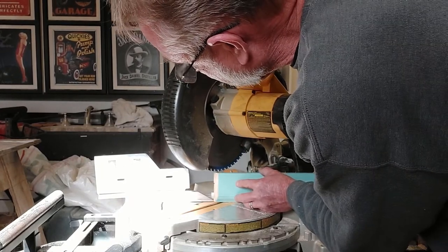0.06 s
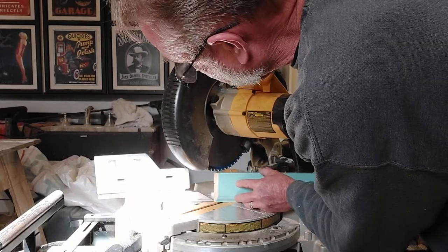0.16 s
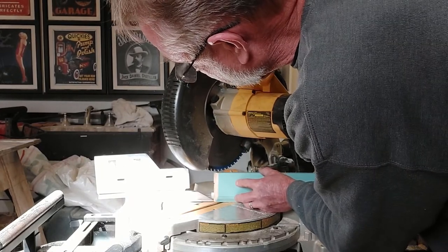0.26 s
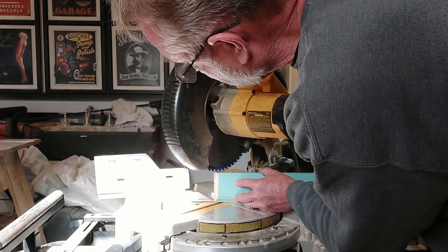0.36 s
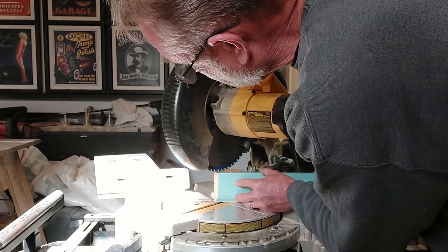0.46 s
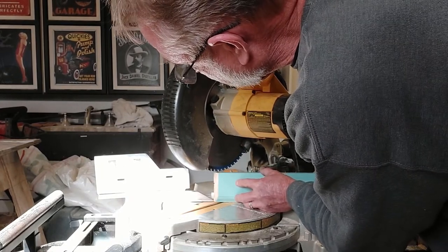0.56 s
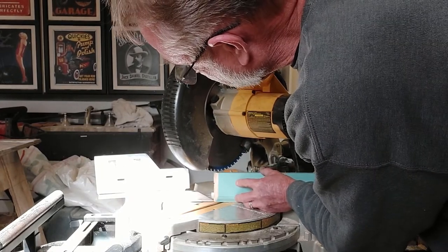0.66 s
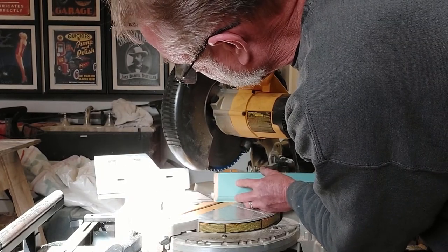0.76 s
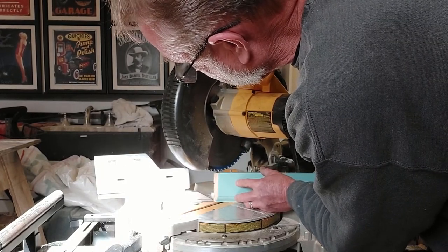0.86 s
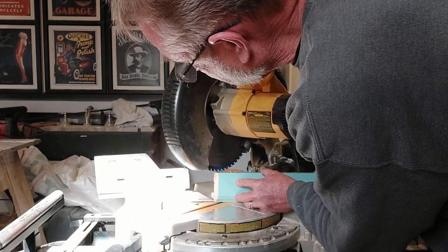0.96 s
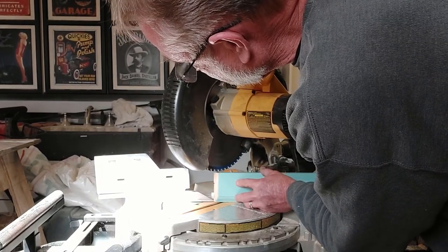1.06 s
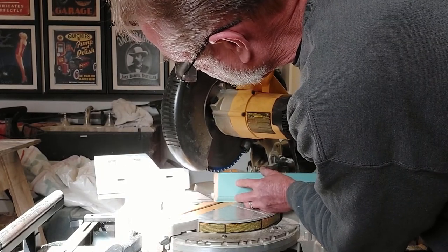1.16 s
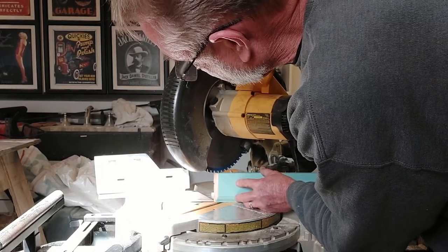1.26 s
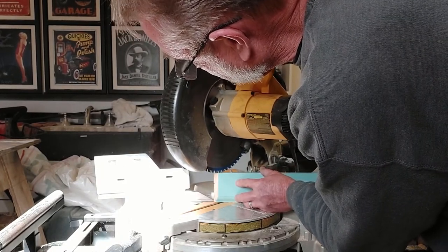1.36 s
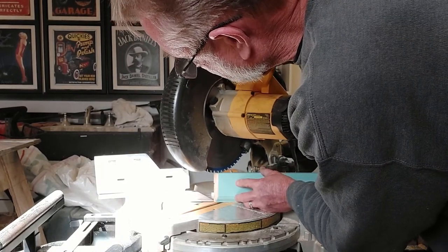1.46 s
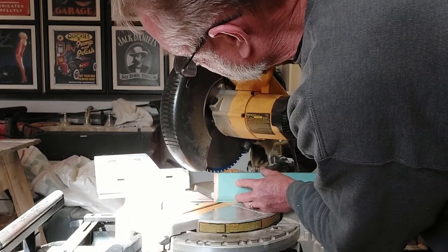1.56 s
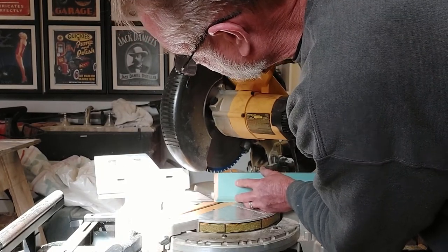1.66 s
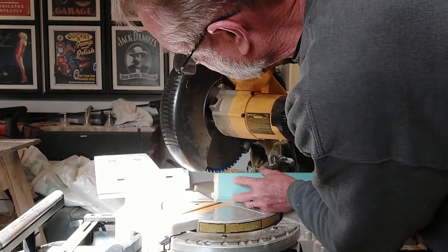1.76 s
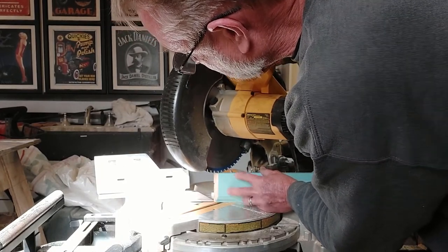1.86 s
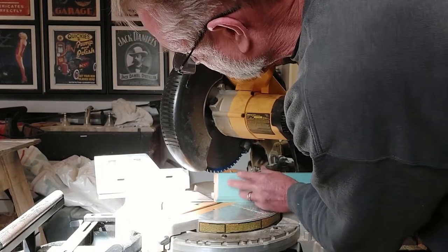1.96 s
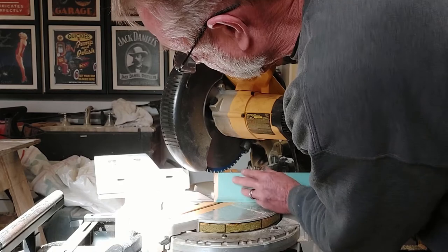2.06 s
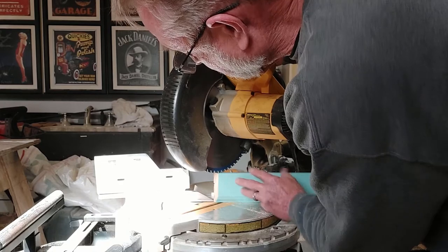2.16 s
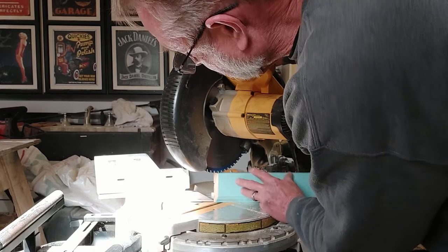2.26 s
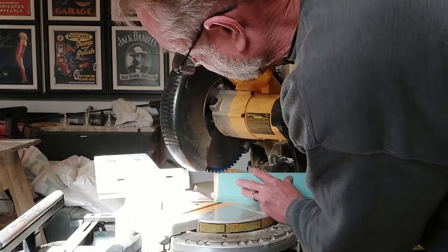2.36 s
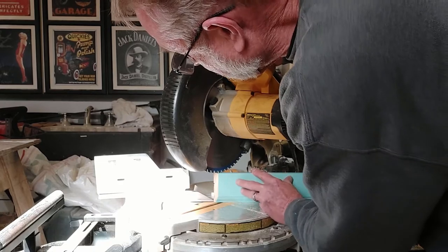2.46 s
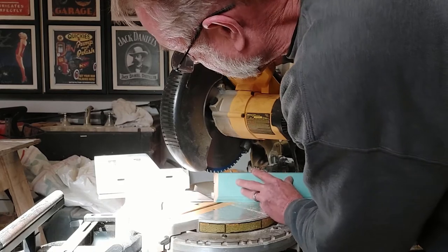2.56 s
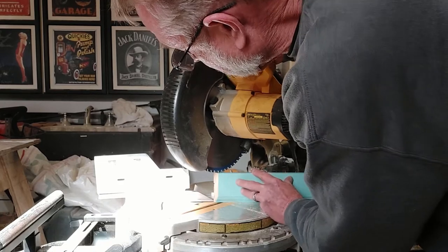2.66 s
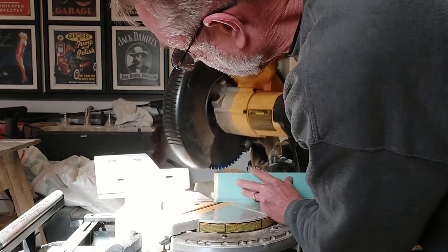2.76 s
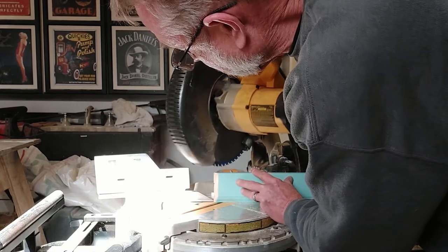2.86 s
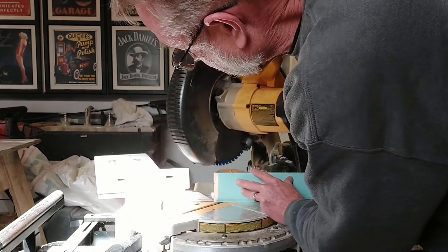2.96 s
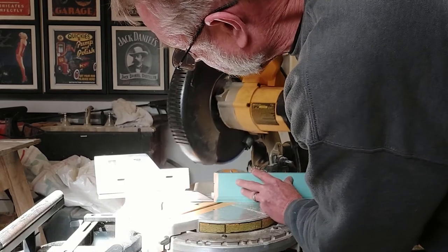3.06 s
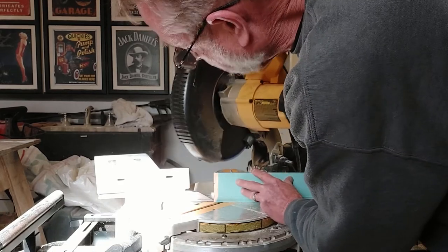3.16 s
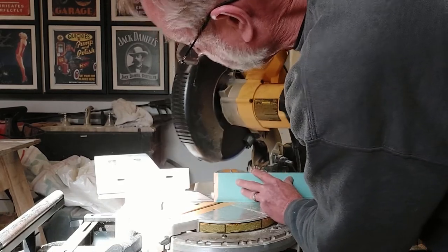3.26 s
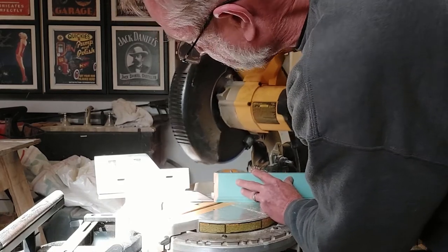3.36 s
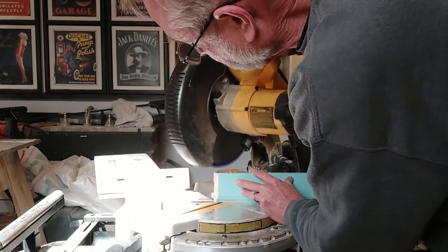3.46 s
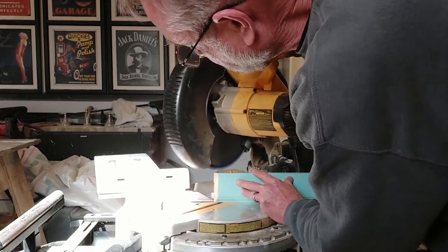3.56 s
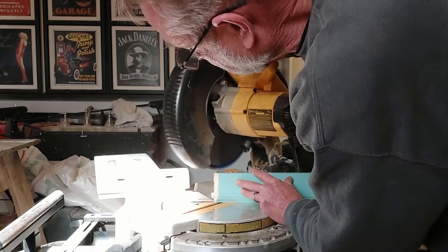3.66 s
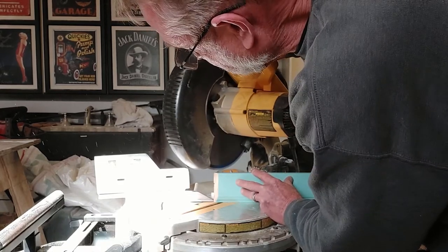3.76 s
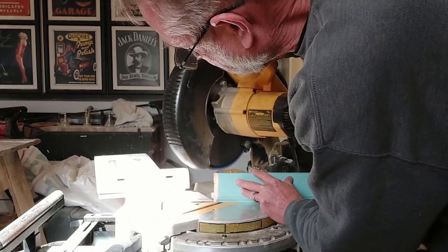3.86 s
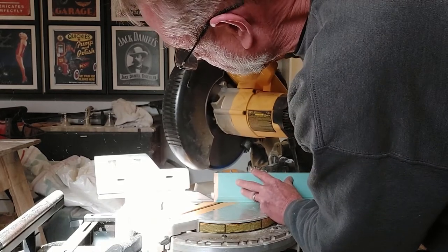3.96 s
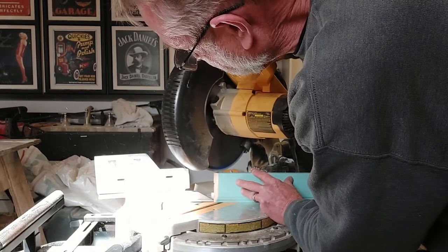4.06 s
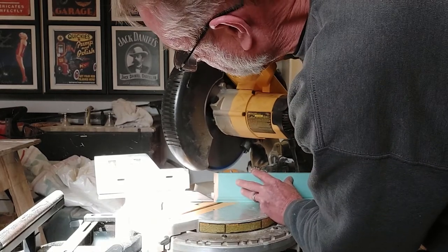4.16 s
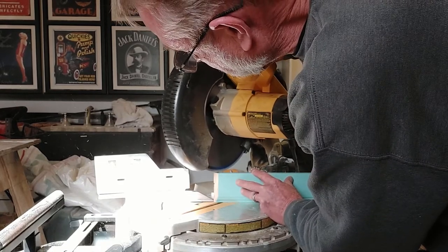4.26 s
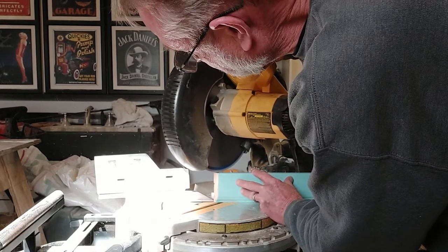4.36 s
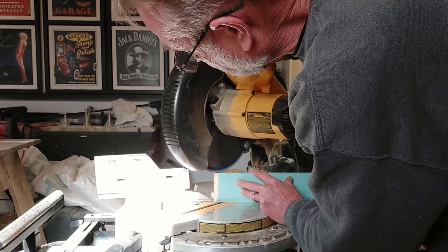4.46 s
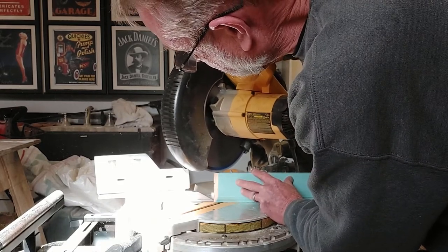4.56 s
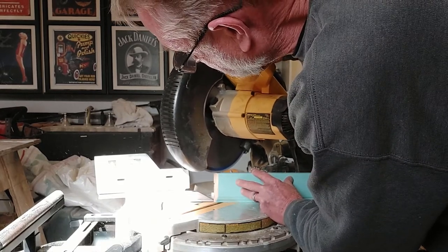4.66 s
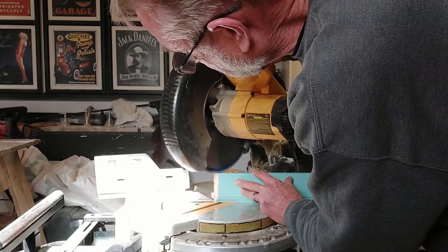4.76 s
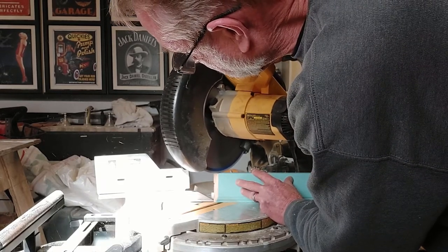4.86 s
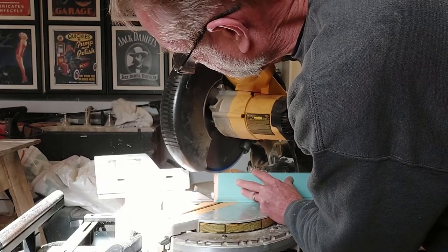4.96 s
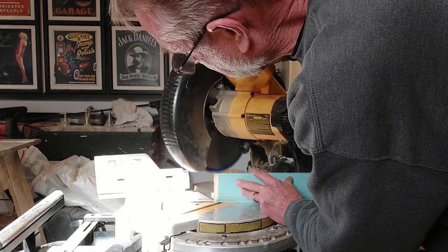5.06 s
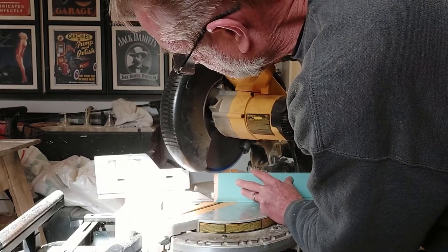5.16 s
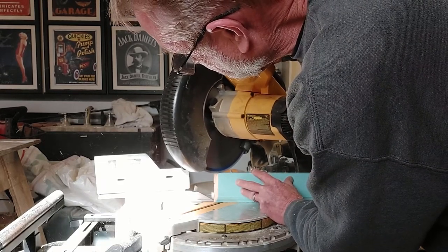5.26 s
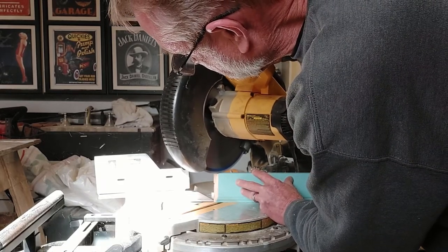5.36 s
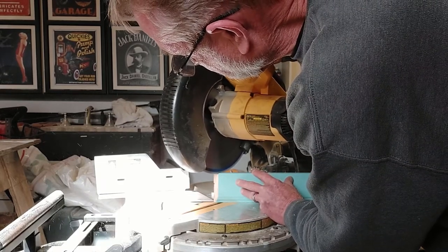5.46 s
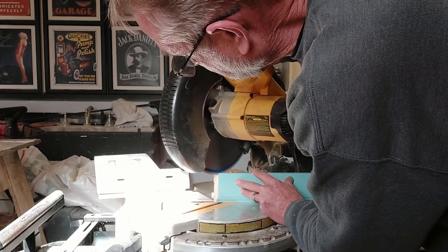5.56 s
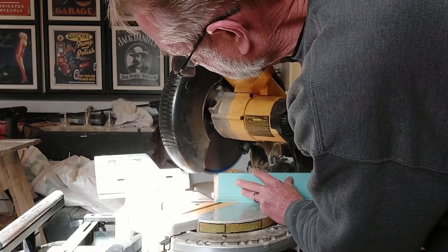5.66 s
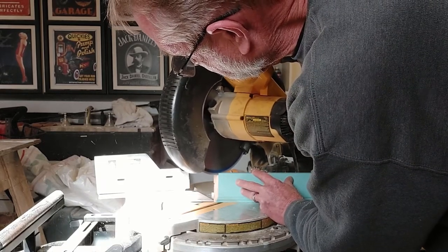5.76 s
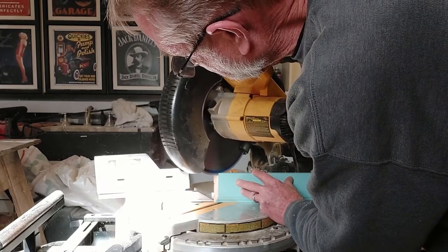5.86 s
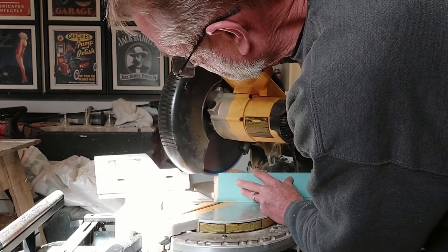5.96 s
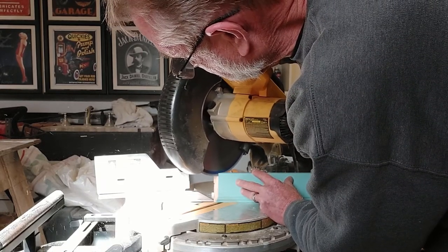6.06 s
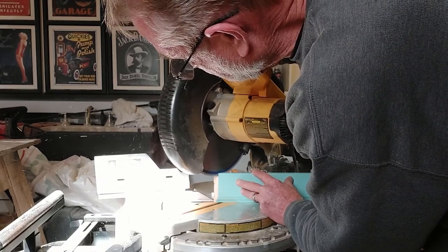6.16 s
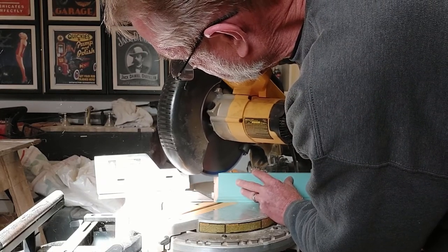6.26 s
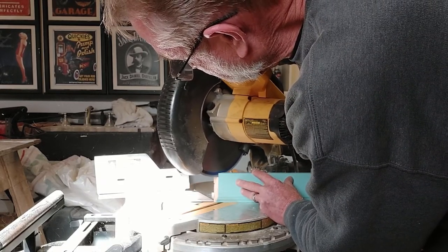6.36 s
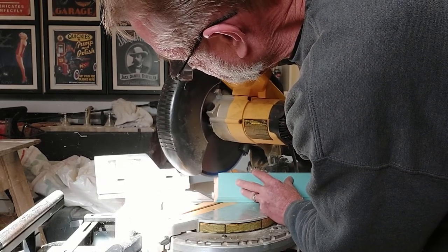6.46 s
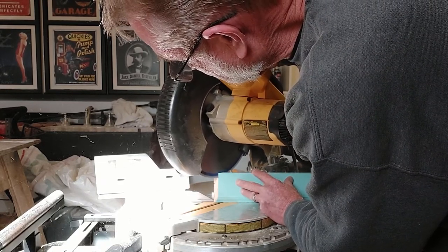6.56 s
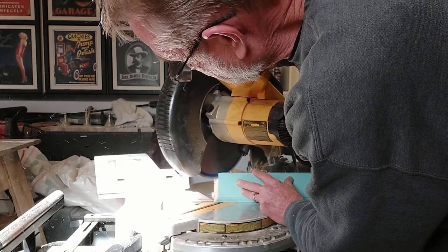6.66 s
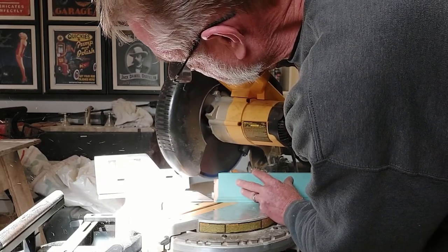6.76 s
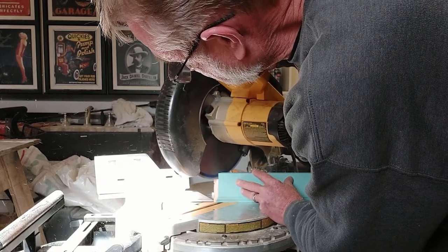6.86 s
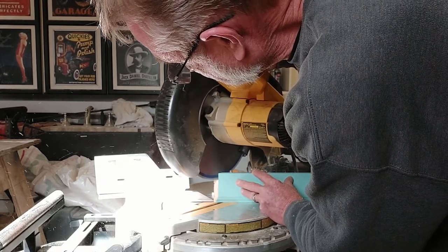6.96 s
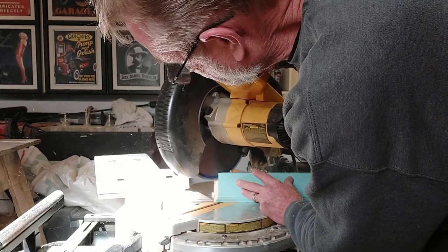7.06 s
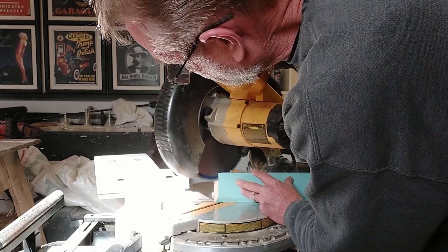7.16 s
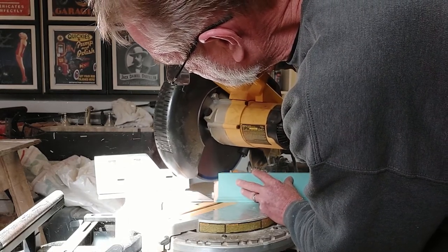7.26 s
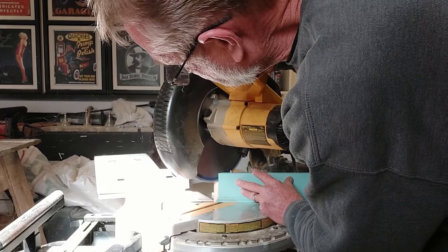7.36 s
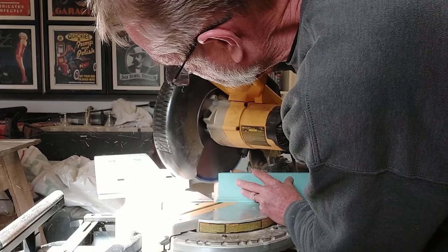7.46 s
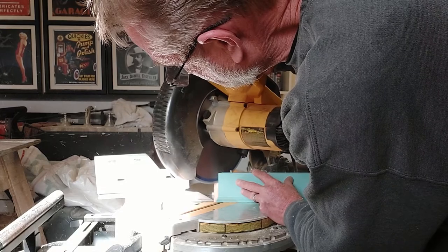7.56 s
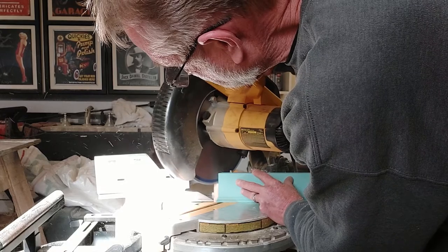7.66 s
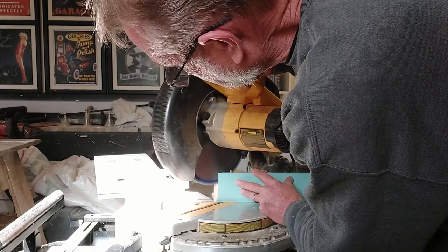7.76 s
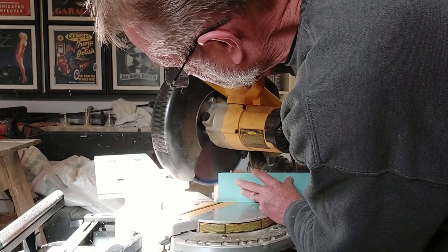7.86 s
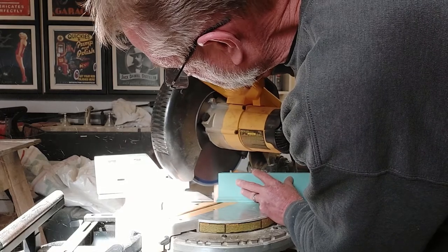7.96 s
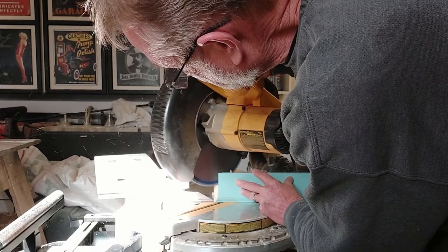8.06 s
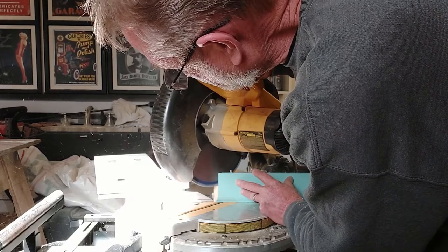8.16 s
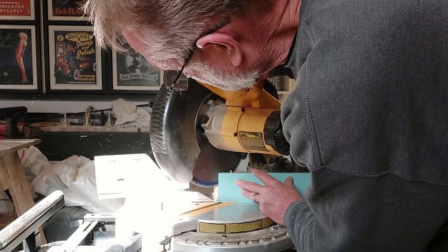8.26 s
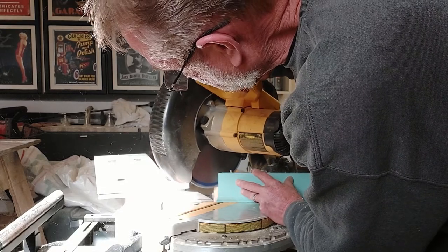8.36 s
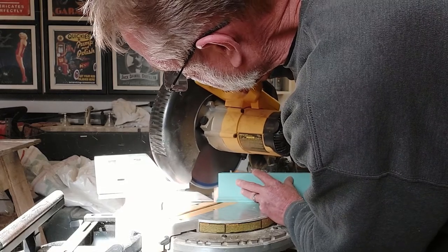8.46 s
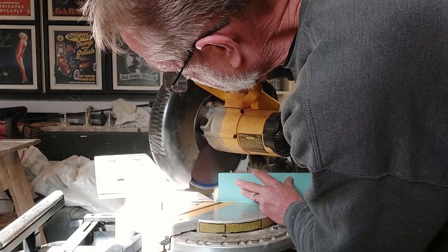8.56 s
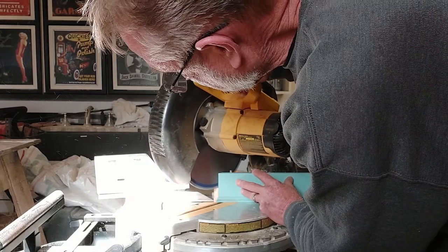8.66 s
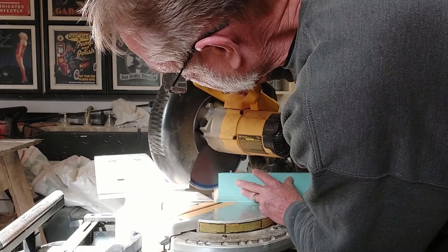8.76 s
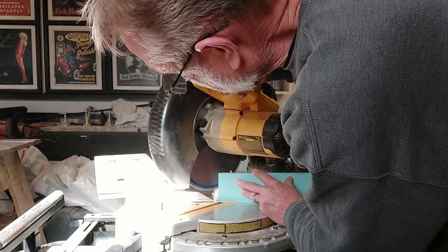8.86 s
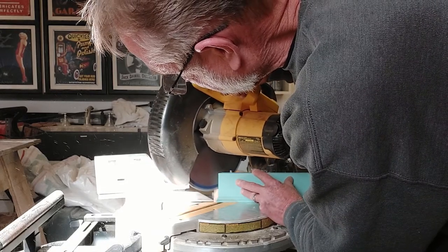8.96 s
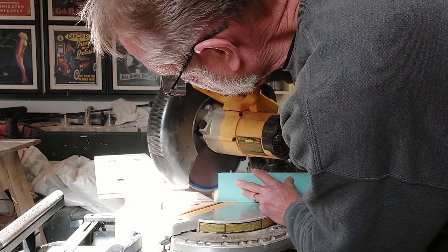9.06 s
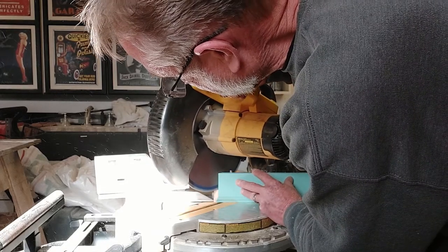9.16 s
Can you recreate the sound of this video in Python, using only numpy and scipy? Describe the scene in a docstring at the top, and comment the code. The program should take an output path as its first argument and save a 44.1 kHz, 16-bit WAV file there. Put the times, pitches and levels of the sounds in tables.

```python
"""A small workshop: a length of wooden trim is nudged along the fence of a miter saw.
Behind it lie a low hum (shaped noise and steady tones), room air and a thin, very high whistle.
The saw's trigger clicks and it spins up with a rising whine: tones follow the motor's speed, over rushing air noise.
The blade is eased into the trim; its steel plate sings and squeals, as wavering tones that follow the load.
A gain control turns everything down as the motor starts."""
import sys
import numpy as np
from scipy import signal
from scipy.fft import rfft, irfft, next_fast_len
from scipy.io import wavfile
from scipy.ndimage import uniform_filter1d, minimum_filter1d, map_coordinates

SR = 44100
rng = np.random.default_rng(int(sys.argv[2]) if len(sys.argv) > 2 else 0)


def dump(signal):
    """Clip the signal to [-1, 1] and save it as 16-bit WAV at the path in sys.argv[1]."""
    limited = np.clip(np.atleast_2d(signal).T, -1, 1)
    pcm = np.round(limited * 32767).astype(np.int16)
    wavfile.write(sys.argv[1], SR, pcm)


N = 406161
TIME = np.arange(N) / SR  # seconds
START = 3.085  # the motor starts (s)
CONTACT_S, ENTRY_S = 4.76, 0.06  # the teeth touch the trim; time until they are all cutting
FULL_HZ = 372.55  # the motor's free speed (turns a second)
RANGE_DB = 20  # the most that the gain control turns down

# colour of a dull wooden knock: (frequency [Hz], level per Hz [dB])
WOOD_COLOUR = [(120, -45), (200, -32), (291, -40), (374, -17), (475, -30), (559, -2.5), (856, 5),
               (1030, 4.5), (1540, -8), (4000, -19), (5200, -23), (8800, -120)]
# colour of a bright click: (frequency [Hz], level per Hz [dB])
CLICK_COLOUR = [(400, -30), (900, -7), (2000, 0), (2700, -3), (3300, -1), (4000, -6), (5600, -4.5),
                (8500, -9), (11000, -17), (15000, -24)]


def amp(db):
    """Turn decibels into a gain."""
    return np.exp(np.asarray(db) * (np.log(10) / 20))


def unit(x):
    """Scale a sound to rms 1."""
    return x / np.sqrt(np.mean(x ** 2) + 1e-20)


def along(points, hz):
    """Read a curve of (Hz, value) points on a log frequency axis."""
    f, v = np.transpose(points)
    return np.interp(np.log(hz + 1), np.log(f + 1), v)


def curves(rows):
    """Give one value per sample for each column after the time."""
    s, *cols = np.transpose(rows)
    return [np.interp(TIME, s, c) for c in cols]


def wobble(rate):
    """Draw a smooth random curve with rate random points a second."""
    coarse = np.arange(0, N / SR * rate + 1, 1 / 8)
    points = rng.standard_normal(int(N * rate / SR) + 4)
    return np.interp(TIME * rate, coarse, map_coordinates(points, [coarse]))


def ramp(start_s, rise_s):
    """Go from 0 to 1 in a straight line."""
    return np.clip((TIME - start_s) / max(rise_s, 1e-4), 0, 1)


def swell(start_s, length_s, rise_s, fall_db_per_s):
    """Rise, hold until the length is over, die away."""
    overtime = np.maximum(TIME - start_s - length_s, 0)
    return ramp(start_s, rise_s) * amp(-abs(fall_db_per_s) * overtime)


def filtered(x, response):
    """Reshape the spectrum of x by a gain for each frequency."""
    m = next_fast_len(N + SR // 2)
    return irfft(rfft(x, m) * response(np.fft.rfftfreq(m, 1 / SR)), m)[:N]


def noise(spectrum):
    """Make coloured noise of rms 1."""
    return unit(filtered(rng.standard_normal(N), lambda hz: amp(along(spectrum, hz))))


def body(modes, f):
    """Complex response of (Hz, width Hz, dB) resonances, with alternating signs, at the frequencies f."""
    return sum((-1) ** k * amp(db) * 1j * f * width / (centre * centre - f * f + 1j * f * width)
               for k, (centre, width, db) in enumerate(modes))


def resonate(x, modes):
    """Pass x through a body's resonances, at rms 1."""
    return unit(filtered(x, lambda f: body(modes, f)))


def lift(modes, f):
    """Boost a tone as it sweeps through (Hz, width Hz, dB) resonances."""
    return 1 + sum(np.abs(body([mode], f)) for mode in modes)


def above(f, edge_hz, order):
    """Gain of a part that radiates only above an edge frequency."""
    return 1 / (1 + (edge_hz / (f + 1)) ** order)


def tone(cycles, flutter_db, blur, rate):
    """Make a tone of rms 1 whose level and phase waver; cycles counts its periods so far."""
    phase = 2 * np.pi * (cycles - np.floor(cycles)) + blur * wobble(2 * rate)
    return unit(amp(flutter_db * wobble(rate)) * np.sin(phase))


def background():
    """Low hum, room air and a thin whistle that wavers in pitch; all of it fades up at the start."""
    # steady tones in the hum: (frequency [Hz], level [dB])
    room_tones = [(120, -50), (840, -60.5), (2050, -60)]
    # colours of the hum, the air and the hiss around the whistle: (frequency [Hz], level per Hz [dB])
    hum_colour = [(15, -52), (25, -49), (53, -7), (75, 2.5), (128, -7.5), (206, -18), (237, -10),
                  (251, -14), (263, -31.5), (328, -19.5), (400, -24), (520, -23), (880, -120)]
    air_colour = [(120, -24), (240, 0.5), (400, -7), (830, -9), (1300, -11), (2100, -13.5), (3300, -18),
                  (7000, -20), (11000, -20.5), (15500, -11.5)]
    hiss_colour = [(13000, -44), (14100, 2), (14550, -10), (14715, -5), (14900, -9), (15500, -14)]
    whistle_hz = 14715
    fade_db, fade_s = -5, 0.84  # it starts this much lower and comes up over this time
    tones = sum(amp(db) * tone(hz * TIME, flutter_db=2.0, blur=0.4, rate=5) for hz, db in room_tones)
    whistle = tone(whistle_hz * TIME + 0.45 * wobble(90), flutter_db=0.0, blur=0.5, rate=130)
    high = amp(-0.5) * whistle + amp(-9.5) * noise(hiss_colour)
    high = amp(-33.5 + 1.1 * wobble(22)) * high
    steady = amp(-40.5) * noise(hum_colour) + tones + amp(-41.5) * noise(air_colour) + high
    return amp(fade_db * (1 - ramp(0, fade_s))) * steady


def handling():
    """The trim knocks and slides in small slips, a hand brushes over it, and last the trigger clicks."""
    # knocks of trim and saw's head, and last the click of the trigger:
    # (time [s], low knock level [dB], bright click level [dB])
    knocks = [(0.384, -45, -49), (0.46, -40, -54), (1.005, -39, -28.5), (1.146, -36.5, -38),
              (1.226, -34, -40), (1.609, -43, -52), (1.765, -37, -40.5), (2.091, -19.5, -24.5),
              (2.273, -37, -39), (2.478, -32, -52), (2.697, -39, -45), (2.782, -35, -43), (2.996, -27, -39),
              (3.06, -40, -32)]
    # the trim is pushed over the table: (start [s], length [s], relative level [dB])
    slides = [(1.139, 0.015, -31.5), (1.225, 0.077, -42), (1.771, .02, -42), (2.28, .02, -44),
              (2.863, 0.16, -34)]
    # resonances of trim and saw table: (frequency [Hz], width [Hz], level [dB])
    table_modes = [(576, 12, 4.5), (855, 23, 2), (889, 12, -3), (1070, 12, 1), (1380, 27, -7),
                   (1755, 160, -8.5), (2073, 19, 0), (2260, 36, -6.5), (2660, 87, -6.5), (3300, 160, -17),
                   (4000, 150, -15.5), (4700, 350, -17.5), (7150, 870, -28)]
    # colour of a palm brushing the trim: (frequency [Hz], level per Hz [dB])
    palm_colour = [(300, -27), (900, 0), (1300, -2), (2200, -7), (3500, -7), (7500, -9.5), (9000, -24),
                   (15000, -35)]
    low, high = np.zeros(N), np.zeros(N)
    for s, knock_db, click_db in knocks:
        age = np.maximum(TIME - s, 0)
        begun = TIME >= s
        crack = amp(click_db + 3 - 60 * age / 0.0095)  # falls 60 dB in 0.0095 s
        rattle = amp(click_db - 60 * age / 0.098)
        low += begun * amp(knock_db - 60 * age / 0.087)
        high += begun * (crack + rattle)
    push = sum(amp(db) * swell(s, length, rise_s=0.0068, fall_db_per_s=230) for s, length, db in slides)
    slips = push * resonate(rng.standard_normal(N) * amp(6.0 * wobble(160)), table_modes)
    # the hand shifts its grip
    grip = amp(-43.5 + 2.6 * wobble(29.7)) * swell(1.81, length_s=0.51, rise_s=0.12, fall_db_per_s=75)
    brush = grip * noise(palm_colour)
    return low * noise(WOOD_COLOUR) + high * noise(CLICK_COLOUR) + slips + brush


def walls(x):
    """The workshop's short echo: a fading burst of noise whose highest treble dies faster than its middle."""
    # how long the echo takes to fall by 60 dB: (frequency [Hz], time [s])
    fade_times = [(200, 0.34), (2000, 0.52), (12000, 0.32)]
    hz, t, z = signal.stft(rng.standard_normal(SR // 2), SR, nperseg=256)
    fading = z * amp(-60 * t / along(fade_times, hz)[:, None])
    tail = signal.istft(fading, SR, nperseg=256)[1]
    delayed = np.pad(tail, (200, 0))  # 200 samples of silence first
    return signal.fftconvolve(x, delayed / np.linalg.norm(tail))[:N]


def shaft():
    """Motor turns a second: a quick surge, a slow creep to full speed, a slight sag in the cut."""
    # deep in the cut the motor slows: (time [s], speed lost [turns a second])
    sag = [(6.5, 0), (8.3, 4.07)]
    surge_share, surge_s, creep_s = 0.4395, 0.1297, 0.6061  # share gained in the surge; time constants
    age = np.maximum(TIME - START, 0)
    lacking = surge_share * np.exp(-age / surge_s) + (1 - surge_share) * np.exp(-age / creep_s)
    return np.maximum(FULL_HZ * (1 - lacking) - curves(sag)[0], 0)


def kick():
    """The switch snaps, the gears take up their slack, and the windings hum under the inrush current."""
    # resonances of the straining gearbox: (frequency [Hz], width [Hz], level [dB])
    gearbox_modes = [(470, 58, -9), (865, 48, 2), (1050, 70, -9), (1180, 71, -2.5), (1730, 260, -8),
                     (2140, 510, -12), (4640, 3000, -21.5)]
    age = np.maximum(TIME - START, 0)
    mains = 2 * np.pi * 120 * TIME  # phase of a 120 Hz hum, twice the mains frequency
    grinding = rng.standard_normal(N) * amp(2.4 * wobble(110)) * (1 + 0.24 * np.cos(mains))
    strain = amp(-10.5) * swell(START, length_s=0.12, rise_s=0.054, fall_db_per_s=74)
    growl = strain * resonate(grinding, gearbox_modes)
    snap = amp(-6.0 - 60 * age / 0.064) * noise(CLICK_COLOUR) * ramp(START, rise_s=0.0016)
    # the clunk peaks 0.011 s after the snap starts
    clunk = amp(-4.5 - 60 * np.abs(age - 0.011) / 0.022) * noise(WOOD_COLOUR)
    inrush = amp(-40 - 16 * age) * (np.sin(mains) + 1.25 * np.sin(2 * mains))
    return growl + snap + clunk + inrush


def motor(speed, turns, load):
    """Armature whine, unbalance, shaft tones and the gear mesh, which is loudest while it speeds up the blade."""
    # tones locked to the shaft: (multiple of its turn, relative level [dB], change under full load [dB])
    orders = [(2, -38, 5), (3, -35, -3), (6, -37.5, 1.5), (9, -38, 0.5), (22, -33, -5), (31, -45, -7)]
    # overtones of the gear mesh: (multiple of the mesh, relative level [dB])
    mesh_overtones = [(2, 1), (3, -7)]
    # resonances that lift the mesh as it sweeps through: (frequency [Hz], width [Hz], level [dB])
    gearbox_lifts = [(2920, 150, 11), (3630, 450, 12.5)]
    slots, pinion = 19, 14  # armature slots and gear teeth passing per turn
    pace = speed / FULL_HZ
    torque = np.abs(1 - pace)

    whine_gain = amp(-19 - 10 * load ** 1.4) * above(slots * speed, edge_hz=5600, order=20)
    whine = whine_gain * tone(slots * turns, flutter_db=3.5, blur=0.66, rate=25)
    shake_gain = amp(-36 - 7.5 * load) * above(speed, edge_hz=332, order=40)
    shake = shake_gain * tone(turns, flutter_db=-0.5, blur=0.52, rate=12)
    shaft_tones = pace ** 8 * sum(
        amp(db + load_db * load) * tone(round(k) * turns, flutter_db=4.0, blur=0.61, rate=10)
        for k, db, load_db in orders)

    mesh_hz = pinion * speed
    mesh_gain = amp(-22.5) * torque * lift(gearbox_lifts, mesh_hz) * above(mesh_hz, edge_hz=2500, order=12)
    mesh = mesh_gain * tone(pinion * turns, flutter_db=1.5, blur=1.6, rate=110)
    overtone_gain = amp(-33) * (torque + 0.004) ** 0.38 * above(mesh_hz, edge_hz=3400, order=30)
    overtones = overtone_gain * sum(
        amp(db) * tone(round(k) * pinion * turns, flutter_db=-2, blur=1.1, rate=70)
        for k, db in mesh_overtones)
    return whine + shake + shaft_tones + mesh + overtones


def air(speed, turns, load):
    """The fan roars in the housing, rippling with each turn and at 120 Hz; air hisses off the teeth."""
    # colour of rushing air: (frequency [Hz], level per Hz [dB])
    rush_colour = [(59, -64), (100, -22), (306, -16), (355, -10), (937, -5), (1090, -7.5), (1340, -10.5),
                   (1660, -3), (1960, -5), (2640, -3), (2990, -5), (6820, -2.5), (8790, -10.5),
                   (14300, -16), (15500, -31)]
    # resonances of the motor housing: (frequency [Hz], width [Hz], level [dB])
    housing_modes = [(375.6, 41, -5.5), (462, 35, -1.5), (563.5, 25, 1.5), (665.5, 26, -1), (839, 40, -2),
                     (1079, 29, -2.5), (1237, 59, -3.5), (1719, 47, -1.5), (2410, 86, -8),
                     (2654, 220, -6.5)]
    pace = speed / FULL_HZ
    rush = noise(rush_colour)

    def band(lo_hz, hi_hz):
        """Cut one band out of the rushing air, at rms 1."""
        return unit(filtered(rush, lambda f: 1 / np.sqrt(
            (1 + (lo_hz / (f + 1)) ** 8) * (1 + (f / hi_hz) ** 8))))

    ringing = resonate(rng.standard_normal(N), housing_modes)
    housing = unit(filtered(ringing, lambda f: above(f, edge_hz=348, order=10)))
    roar = amp(-21.5 - 2.5 * load) * (amp(-3.5) * band(lo_hz=119, hi_hz=1690) + amp(-2) * housing)
    fan_low = amp(-20) * pace ** 0.11 * band(lo_hz=2060, hi_hz=4080)
    fan_top = amp(-21) * pace ** 0.93 * band(lo_hz=4250, hi_hz=6860)  # needs more speed
    fan = amp(-2.5 * load) * (fan_low + fan_top)
    # the hiss grows with speed and steps up 3 dB once the teeth touch wood
    hiss = amp(-27 + 3 * ramp(CONTACT_S, ENTRY_S)) * pace ** 2.4 * band(lo_hz=7900, hi_hz=16000)
    chop = 1 + 0.029 * np.cos(2 * np.pi * turns) + 0.059 * np.cos(2 * np.pi * 2 * 60 * TIME)
    flow = roar * amp(1.6 * wobble(25)) + (fan + hiss) * amp(1.3 * wobble(18))
    return flow * chop * ramp(START, rise_s=0.051)


def blade(speed, turns, load):
    """The geared-down blade whistles and howls in its guard; its teeth tear chips, and it sings in the cut."""
    # resonances where the whistle flares as it sweeps through: (frequency [Hz], width [Hz], level [dB])
    flares = [(1277, 37, 17.5), (1510, 49, 1.5)]
    # resonances of the guard: (frequency [Hz], width [Hz], level [dB])
    guard_modes = [(2585, 190, -2), (4590, 560, -4.5)]
    # tones of the passing teeth: (multiple of the blade's turn, relative level [dB])
    tooth_tones = [(28, -53), (30, -27.5), (60, -35), (120, -40), (147, -34.5), (180, -35)]
    # steady tones of the cutting blade, some of them side tones of the squeal one blade turn rate apart:
    # (frequency [Hz], relative level [dB])
    cut_tones = [(2373, -36.5), (3413, -25.5), (4424, -23), (4527, -34), (4764, -16.5), (4840, -22),
                 (4926, -22), (4969, -27), (5136, -21.5), (5238, -19.5), (5385, -40), (5798, -22),
                 (6584, -54), (6810, -39), (8414, -28.5), (9362, -27.5), (9528, -43), (10799, -44),
                 (12075, -53)]
    # colours of the scraping steel and the torn chips: (frequency [Hz], level per Hz [dB])
    steel_colour = [(300, -51), (600, -6.5), (1500, -8.5), (4500, -1), (7000, 8.5), (9000, -7), (12000, -3),
                    (14300, -21), (15500, -28)]
    chip_colour = [(200, -70), (2000, -22), (4300, -7.5), (4750, 6), (5900, -6.5), (7300, 1), (8300, -6),
                   (9100, -33), (9450, 4), (9850, -30), (12000, -26), (15500, -31)]
    warp_swing = 0.35  # how strongly squeals and tooth tones pulse with each blade turn (0-1)
    spin = turns * 3 / 14  # blade turns so far
    whistle_order = 21 * 3 / 14  # whistle cycles per motor turn
    pace, cutting = speed / FULL_HZ, ramp(CONTACT_S, ENTRY_S)

    flare = pace * lift(flares, whistle_order * speed)
    whistle_tone = tone(whistle_order * turns, flutter_db=2.5, blur=0.45, rate=60)
    whistle = amp(-35 + 6 * load) * flare * whistle_tone
    howl_gain = amp(-21 - 18 * load) * above(speed, edge_hz=200, order=10)
    howl = howl_gain * resonate(rng.standard_normal(N), guard_modes)
    teeth = (0.1 * pace + 0.5 * cutting + 0.44 * load) * sum(
        amp(db - 8.0) * tone(round(k) * spin, flutter_db=5.0, blur=0.59, rate=12) for k, db in tooth_tones)

    # no two teeth are alike, so their uneven scrape repeats every turn
    pattern = map_coordinates(rng.standard_normal(size=512), [spin * 512], order=1, mode="grid-wrap")
    scrape = unit(filtered(pattern, lambda hz: amp(along(steel_colour, hz))))
    # louder on contact, and a little more under load
    rasp = amp(-33.5 + 8.5 * cutting + 2.5 * load + 0.81 * wobble(14)) * pace ** 2 * scrape

    singing = sum(amp(db - 3.5) * tone(hz * TIME, flutter_db=4, blur=0.84, rate=14) for hz, db in cut_tones)
    chips = amp(-16.5 + 1.0 * wobble(30)) * noise(chip_colour)
    # a slightly warped blade rubs the kerf (the slot it cuts) once a turn
    rub = 1 + 0.18 * np.cos(2 * np.pi * spin)
    pulse = 1 + np.clip(warp_swing, 0, 1) * np.cos(2 * np.pi * spin + 0.6 * wobble(15))
    cut = rub * load * (singing + chips)
    return whistle + howl + rasp + cut + pulse * (teeth + amp(-1.5) * squeal(load))


def squeal(load):
    """Each mode rings softly with the load and sings out whenever the kerf catches it."""
    # modes that squeal: name -> frequency [Hz]
    squeal_modes = {"A": 4689, "B": 5480, "C": 5878, "D": 6402, "E": 7474}
    # the kerf catches a mode: (mode name, start [s], length [s], relative level [dB])
    catches = [("D", 5.42, 0.26, -19), ("A", 5.6, 0.11, -19.5), ("A", 5.87, 0.61, -15),
               ("C", 5.9, 0.36, -15), ("E", 5.3, 1.2, -25), ("B", 6.17, 0.18, -15),
               ("A", 6.46, 0.58, -19.5), ("C", 6.62, .88, -25), ("B", 6.73, .36, -16.5),
               ("A", 7.03, 1.04, -22), ("D", 7.88, 0.25, -22), ("C", 8.08, 0.12, -27),
               ("D", 8.39, 0.76, -21), ("A", 9.08, .1, -19)]
    drive = {mode: amp(-30.5) * load for mode in squeal_modes}
    for mode, s, length, db in catches:
        caught = amp(db) * swell(s, length, rise_s=0.1, fall_db_per_s=76)
        drive[mode] = np.maximum(drive[mode], caught)
    return sum(drive[mode] * tone(hz * TIME, flutter_db=2.0, blur=0.65, rate=22)
               for mode, hz in squeal_modes.items())


def scene():
    """Motor speed and cutting load drive the far louder saw; both channels carry the same sound."""
    # how deeply the teeth bite: (time [s], load [0-1])
    bite = [(4.8, 0.24), (5.4, 0.33), (5.65, 0.74), (6.3, 0.77), (7.45, 1), (8.4, 0.56), (9.21, 0.42)]
    speed = shaft()
    turns = np.cumsum(speed) / SR
    load = curves(bite)[0] * ramp(CONTACT_S, ENTRY_S)
    saw = motor(speed, turns, load) + kick() + air(speed, turns, load) + blade(speed, turns, load)
    saw = saw * (TIME > START)
    touches = handling()
    saw_in_room = amp(RANGE_DB) * (saw + amp(-7.5) * walls(saw))
    touches_in_room = touches + amp(-3.5) * walls(touches)
    mono = saw_in_room + touches_in_room + background()
    return np.array([mono, mono])


def record(dry):
    """Turn loud sound down within a limited range, round off the peaks and cut the highest treble."""
    top_hz = 15700
    level = np.sqrt(np.abs(uniform_filter1d(dry[0] ** 2, size=180)) + 1e-12)
    gain = np.clip(amp(-17) / level, amp(-RANGE_DB), 1)
    # hold the lowest gain of the last 2001 samples, then smooth its steps
    held = minimum_filter1d(gain, size=2001, origin=1000)
    x = dry * uniform_filter1d(held, size=60)
    x = x / (1 + np.abs(x / 0.98) ** 6) ** (1 / 6)  # soft clipping
    return np.array([filtered(ch, lambda hz: hz < top_hz) for ch in x])


dry = scene()
out = record(dry)
dump(out)
```